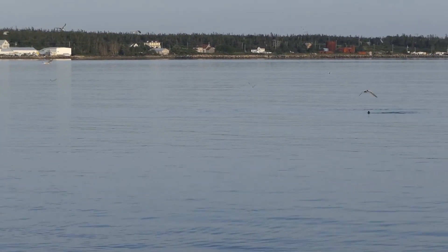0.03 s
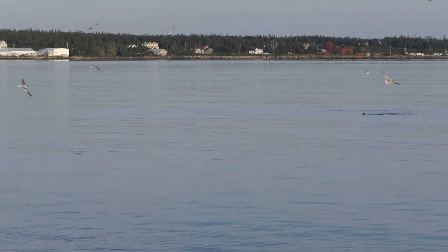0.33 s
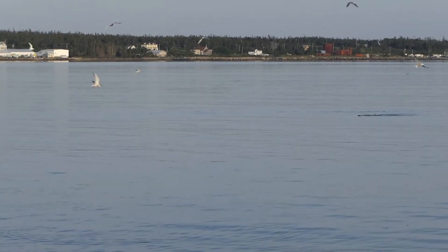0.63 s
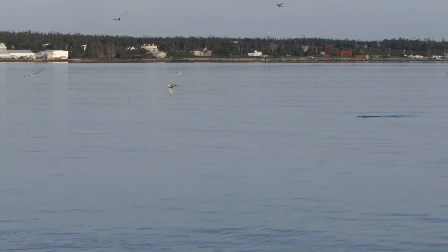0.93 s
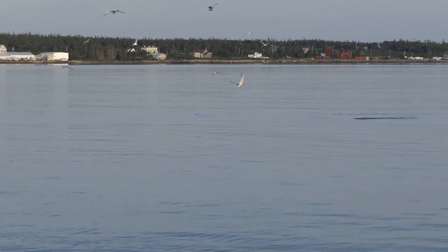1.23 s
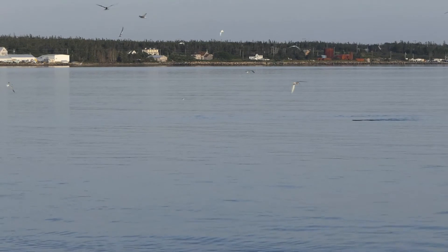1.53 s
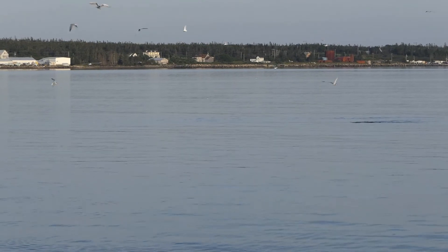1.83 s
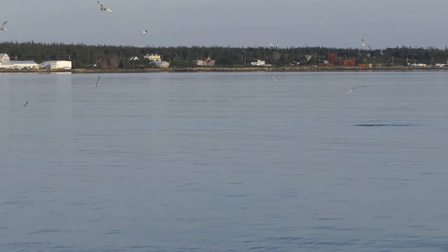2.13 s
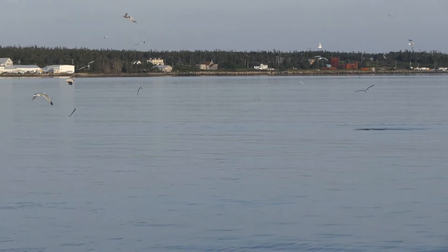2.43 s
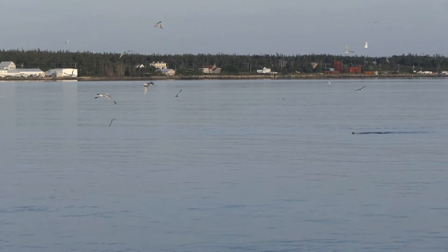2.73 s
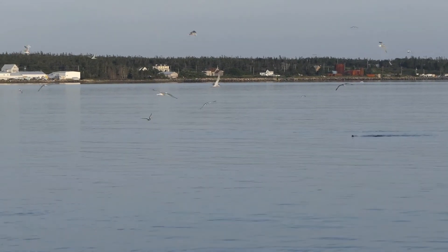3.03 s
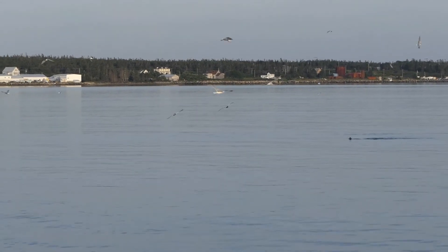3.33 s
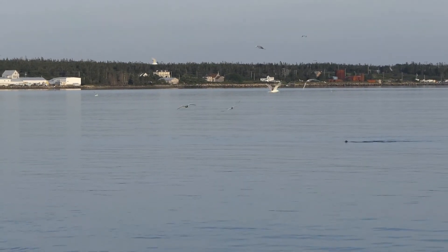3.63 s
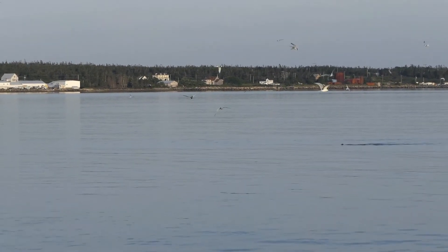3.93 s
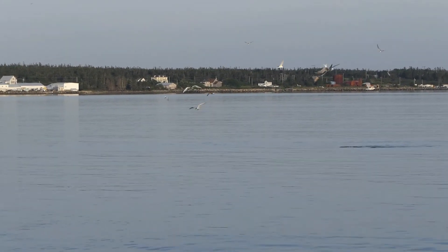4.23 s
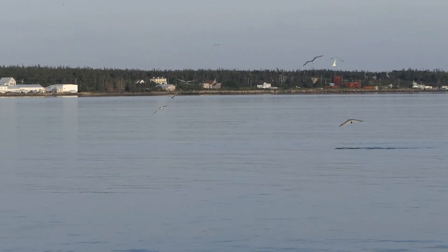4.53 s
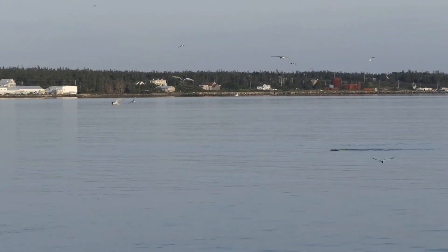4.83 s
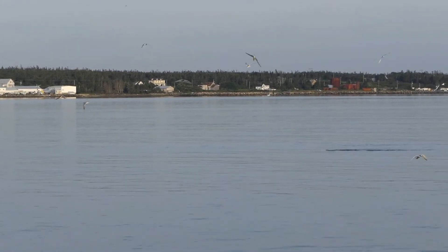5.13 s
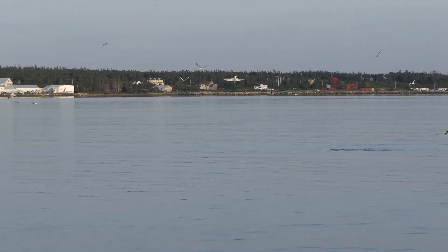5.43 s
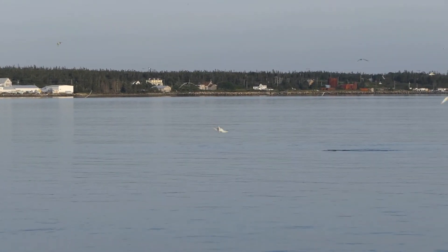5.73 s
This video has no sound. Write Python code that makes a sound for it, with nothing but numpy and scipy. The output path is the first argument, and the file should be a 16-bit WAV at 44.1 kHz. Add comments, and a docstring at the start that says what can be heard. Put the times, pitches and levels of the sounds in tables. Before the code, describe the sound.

Terns call over quiet open water, first with sparse chips, later with two short, grating rasps that stand out a little to the right. Just before the rasps, a nearby camera shutter clicks four times in rapid succession. Small plops and faint ticks dot the rest, along with more chips. Throughout, a far boat engine hums low behind soft lapping and a slight hiss.

```python
"""Terns call over a calm bay: two harsh rasps among short chips, peeps and thin, broken whistles.
The rasps are paired pulses of the syrinx through throat resonances; the other calls are harmonic notes.
A close camera shutter fires a burst of four, its strokes ringing the modes of the body.
Small plops, ticks and laps are noise bursts in a resonance. Behind it all, a far boat engine
drones as fading tones and exhaust rumble, with the wash of the water and a high hiss."""
import sys
import numpy as np
from scipy import signal
from scipy.fft import rfft, irfft
from scipy.io import wavfile
from scipy.ndimage import uniform_filter1d

SR = 44100
rng = np.random.default_rng(int(sys.argv[2]) if len(sys.argv) > 2 else 0)


def digitize_waveform(pressure):
    """Quantize a signal to 16-bit integers and store it at the path in sys.argv[1].

    Rows of a 2-D input are taken as channels; values are limited to [-1, 1].
    """
    field = np.atleast_2d(pressure).T
    bounded = np.clip(field, -1, 1)
    quanta = np.round(bounded * 32767).astype(np.int16)
    wavfile.write(sys.argv[1], SR, quanta)


N = 254456
TIME_S = np.arange(N) / SR
BINS_HZ = np.maximum(np.fft.rfftfreq(N, 1 / SR), 1)

# swell of the water: (time [s], level change [dB])
WASH_SWELL = [(0, 2), (.6, -1.5), (1.4, -5), (2.3, 0.5), (3.1, 3), (4.5, 0), (5.5, 3), (5.77, 0.5)]


def from_db(db):
    """Decibels to gain."""
    return 10 ** (np.asarray(db) / 20)


def unit_rms(x):
    """Scale to rms 1."""
    return x / np.sqrt(np.mean(x ** 2) + 1e-20)


def at_hz(points, hz):
    """Interpolate (frequency, value) points on a log-frequency axis."""
    point_hz, value = np.transpose(points)
    return np.interp(np.log(hz), np.log(point_hz), value)


def colour(x, spectrum_db):
    """Minimum-phase filter with the given spectrum."""
    cepstrum = irfft(np.log(from_db(at_hz(spectrum_db, BINS_HZ))), N)
    cepstrum[1:N // 2] *= 2
    cepstrum[N // 2 + 1:] = 0
    return irfft(rfft(x) * np.exp(rfft(cepstrum)), N)


def band_limit(x, edges_hz, kind):
    """Butterworth filter."""
    return signal.sosfilt(signal.butter(4, edges_hz, kind, fs=SR, output="sos"), x)


def resonate(x, hz, width_hz):
    """Steep resonance: two equal two-pole stages, each width_hz wide."""
    radius = np.exp(-np.pi * width_hz / SR)
    poles = [1, -2 * radius * np.cos(2 * np.pi * hz / SR), radius ** 2]
    once = signal.lfilter([1, 0, -1], poles, x)
    return signal.lfilter([1, 0, -1], poles, once)


def drift(corner_hz):
    """Low-passed random signal, rms 1."""
    return unit_rms(irfft(rfft(rng.standard_normal(N)) / (1 + (BINS_HZ / corner_hz) ** 2), N))


def stereo_noise(correlation):
    """White noise with the given left-right correlation."""
    mid, side = rfft(rng.standard_normal((2, N)))
    spectrum = np.sqrt(1 + correlation) * mid + np.sqrt(1 - correlation) * side * [[1], [-1]]
    return irfft(spectrum, N) / np.sqrt(2)


def pan(x, left_db):
    """Place by left-minus-right level."""
    return x * from_db(np.array([[1], [-1]]) * left_db / 2)


def scatter(x, wet_db, decay_s):
    """Weak reflections off shore and water, different at each ear."""
    t = TIME_S[:SR // 2]
    tail = rng.standard_normal((2, len(t))) * np.exp(-t / decay_s)
    tail /= np.sqrt(np.sum(tail ** 2, axis=1, keepdims=True))
    return from_db(wet_db) * signal.fftconvolve(x[None], tail, axes=1)[:, :N]


def background(rumble_db=-51.5, wash_db=-68, hiss_db=-75):
    """Exhaust rumble, swelling wash of the water and steady high hiss."""
    # noise spectra: (frequency [Hz], relative density [dB])
    rumble_spectrum = [(25, -27.5), (45, -25), (62, -27), (85, -10), (110, 1), (145, -6), (195, -4.5),
                       (235, -1.5), (310, -10.5), (385, -10.5), (440, -16), (510, -16), (700, -21),
                       (1000, -22.5)]
    hiss_spectrum = [(1000, 2.5), (1500, 1), (2200, -6), (3200, -8), (4500, -12), (6500, -17), (8200, -16),
                     (9300, -5.5), (11000, -6), (13000, -7.5), (15500, -11.5)]
    # stereo coherence: (frequency [Hz], left-right correlation [0-1])
    coherence = [(30, 0.97), (70, 0.61), (140, 1), (260, 0.87), (500, 0.49), (1000, 0.22), (3000, 0.081),
                 (8000, 0.57), (14000, .2)]
    correlation = at_hz(coherence, BINS_HZ)
    rumble = unit_rms(band_limit(colour(stereo_noise(correlation), rumble_spectrum), 1000, "low"))
    wash = unit_rms(band_limit(colour(stereo_noise(correlation), hiss_spectrum), [1000, 8000], "band"))
    hiss = unit_rms(band_limit(colour(stereo_noise(correlation), hiss_spectrum), 8000, "high"))
    swell_db = np.interp(TIME_S, *np.transpose(WASH_SWELL)) + 1.07 * drift(16)
    wash = pan(from_db(wash_db + swell_db) * wash, left_db=-1)
    return from_db(rumble_db) * rumble + wash + from_db(hiss_db) * hiss


def engine(gain_db=-1, hunt=0.00091, fade_hz=2, spread=0.1):
    """Engine tones share one slowly hunting speed and fade on their way over the water."""
    # engine tones: (frequency [Hz], relative level [dB], fading depth [0-1])
    tones = [(60.3, -74, .4), (69.3, -79.5, 0.3), (96.4, -66, 0.5), (115.7, -66, 0.4), (119.5, -58.5, 0.54),
             (133.5, -63, 0.17), (155.9, -50, 0.07), (168.6, -63, 1), (178, -63, 0.1), (225.2, -67, 0.25),
             (235, -63.5, 0.39), (296.7, -82, 0.47), (357.4, -71, 0.87), (372.6, -69, 0.63),
             (400, -72.5, 0.42), (583, -78.5, 0.36), (590, -76, 0.7), (711, -71.5, 0.17), (750, -82, 0.6),
             (770, -82, 0), (823, -81.5, 0.23)]
    engine_time_s = np.cumsum(1 + hunt * drift(2.5)) / SR
    out = np.zeros((2, N))
    for hz, db, fading in tones:
        phase = 2 * np.pi * (hz * engine_time_s + rng.random())
        tone = (1 + fading * drift(fade_hz)) * np.sin(phase) + fading * drift(fade_hz) * np.cos(phase)
        side = spread * np.cos(phase) * np.array([[1], [-1]])
        out += np.sqrt(2) * from_db(db) * (tone + side)
    return from_db(gain_db) * out


def lean_right(x):
    """Shift the midrange to the right."""
    # balance of the drone: (frequency [Hz], left minus right [dB])
    balance = [(110, .5), (250, 0), (400, -1), (700, -4.5), (1300, -1.5), (2400, 0.5)]
    return irfft(pan(rfft(x), at_hz(balance, BINS_HZ)), N)


def burst(start_s, level_db, hz, width_hz, decay_s):
    """Decaying noise through one steep resonance."""
    t = TIME_S[:SR // 8]
    noise = rng.standard_normal(len(t)) * np.exp(-t / decay_s)
    ring = resonate(noise, hz, 1.07 * width_hz)
    out, first = np.zeros(N), int(start_s * SR)
    out[first:first + len(t)] = from_db(level_db) * ring * np.sqrt(decay_s * SR / 2 / np.sum(ring ** 2))
    return out


def laps(count=20, level_db=-67, low_hz=895, high_hz=4000):
    """Tiny ripples break at random times and pitches, louder when the wash is."""
    out = np.zeros(N)
    for start_s, height in rng.random((count, 2)) * [TIME_S[-SR // 8 - 1], 1]:
        swell_db = np.interp(start_s, *np.transpose(WASH_SWELL))
        hz = low_hz * (high_hz / low_hz) ** height
        out += burst(start_s, level_db + swell_db, hz, width_hz=2400, decay_s=0.012)
    return out


def ticks():
    """Faint dry ticks, all of one colour."""
    # ticks: (time [s], level [dB])
    events = [(2.872, -62.5), (2.95, -64), (5.524, -62.5), (5.556, -63), (5.585, -71)]
    return sum(burst(start_s, db, hz=3800, width_hz=6900, decay_s=0.01) for start_s, db in events)


def plops(splash_ratio=2.5):
    """Each plop is a hollow ring with a higher, broader splash."""
    # plops: (time [s], level [dB], centre [Hz], width [Hz], decay [s], splash level [dB])
    events = [(2.455, -54.5, 1180, 1390, 0.016, -84), (2.709, -47, 397, 147, 0.013, -50.5),
              (5.0205, -46.5, 1000, 520, 0.0059, -57.5), (5.484, -43, 1516, 150, 0.0049, -76),
              (5.485, -46.5, 967, 70, 0.0054, -63.5), (5.557, -55.5, 1530, 900, .006, -65)]
    out = np.zeros(N)
    for start_s, ring_db, hz, width_hz, decay_s, splash_db in events:
        splash_hz = splash_ratio * hz
        out += burst(start_s, ring_db, hz, width_hz, decay_s)
        out += burst(start_s, splash_db, splash_hz, width_hz=0.82 * splash_hz, decay_s=0.021)
    return out


def shutter(start_s=1.882, cycle_s=0.0995, cycles=4, gain_db=-4, tilt_db_per_oct=5, rattle_db=2):
    """Each cycle is a dull clack, a light touch and a bright return; these and hard stops ring the body."""
    # strokes of one cycle: (delay [s], relative level [dB], rise [s], decay [s], brightness [0-1])
    strokes = [(.002, -50, 0.014, 0.019, 0.1), (0.032, -51, 0.0058, 0.023, 0.04),
               (.049, -48, .003, 0.011, .85)]
    # hard stops of the mechanism: (time [s], relative level [dB], brightness [0-1])
    stops = [(1.878, -44, 0.5), (1.928, -48, 1), (1.984, -47, 0.4), (2.011, -51, .7), (2.0285, -43, .9),
             (2.085, -44, 0.2), (2.127, -47, .95), (2.183, -46, 0), (2.226, -43.5, 0.6)]
    # camera body resonances: (frequency [Hz], width [Hz], gain [dB])
    modes = [(1040, 150, -11), (1657, 103, -10), (2200, 140, -10), (2880, 140, -20), (3860, 510, -9),
             (5050, 150, -10), (6230, 480, -11.5), (7620, 310, -15), (8900, 400, -9), (9800, 1100, -10),
             (11600, 1200, -10)]
    stop_rise_s, stop_decay_s = 0.0006, 0.004
    hits = [(start_s + cycle * cycle_s + delay_s, *shape)
            for cycle in range(cycles) for delay_s, *shape in strokes]
    hits += [(peak_s, db, stop_rise_s, stop_decay_s, brightness) for peak_s, db, brightness in stops]
    peak_s, db, rise_s, decay_s, brightness = np.array(hits).T[:, :, None]
    t = TIME_S[::10]
    falloff = np.maximum((peak_s - t) / rise_s, (t - peak_s) / decay_s)
    envelopes = from_db(db) * np.exp(-np.minimum(falloff, 20))
    rubbing = [stereo_noise(correlation=0.6) for _ in range(2)]
    out = np.zeros((2, N))
    for k, (hz, width_hz, mode_db) in enumerate(modes):
        tilt_db = tilt_db_per_oct * (brightness - 0.5) * np.log2(hz / 4000)
        force = np.linalg.norm(envelopes * from_db(tilt_db), axis=0)
        ring = unit_rms(resonate(rubbing[k % 2], hz, 2 * width_hz))
        out += from_db(mode_db) * np.interp(TIME_S, t, force) * ring
    return out * from_db(gain_db + rattle_db * drift(500))


def note(hz, level_db, harmonics_db, overtone_db, tilt_db_per_oct=0, edge_s=0.0014):
    """Eight harmonics on a pitch contour; the beak favours the first three (harmonics_db)."""
    # envelope of harmonics 4-8: (frequency [Hz], gain [dB])
    overtones = [(5000, 0), (6500, 5.5), (7500, -7), (9500, -3.5), (11300, 0.5), (13500, -18), (16000, -16)]
    t = TIME_S[:len(hz)]
    phase = 2 * np.pi * np.cumsum(hz) / SR
    gate = np.sin(np.pi / 2 * np.clip(np.minimum(t, t[::-1]) / edge_s, 0, 1))
    gains_db = list(harmonics_db) + [overtone_db + at_hz(overtones, k * hz) for k in range(4, 9)]
    tone = sum(from_db(db + tilt_db_per_oct * np.log2(k / 2)) * np.sin(k * phase)
               for k, db in enumerate(gains_db, 1))
    return np.sqrt(2) * from_db(level_db) * tone * gate


def peeps(droop=0.04, arch_db=5, wobble=0.018, flicker=0.29):
    """Each sharp peep swells, fades and droops in pitch at its end."""
    # peeps before the first rasp: (start [s], length [s], pitch [Hz], level [dB])
    calls = [(2.429, 0.0095, 1790, -59), (2.45, .015, 1867, -56.5), (2.477, .009, 1740, -59),
             (2.493, .011, 1740, -62.5), (2.512, .015, 1750, -58), (2.531, .009, 1720, -63)]
    out, shake, waver = np.zeros(N), drift(300), drift(500)
    for start_s, length_s, pitch_hz, peak_db in calls:
        span = slice(int(start_s * SR), int((start_s + length_s) * SR))
        progress = np.linspace(0, 1, span.stop - span.start)
        hz = pitch_hz * (1 - droop * progress ** 2 + wobble * waver[span])
        level_db = peak_db - arch_db * (2 * progress - 1) ** 2
        tone = note(hz, level_db, harmonics_db=(-10, -14, 0.5), overtone_db=-20)
        out[span] += tone * (1 + flicker * shake[span])
    return out


def chips(flicker=0.27, scoop=0.035, sink=0.015, wobble=0.032, sag_db=7, break_hoarse=0.38):
    """Each chip scoops up, holds, then breaks to a weaker, rougher, mostly lower note."""
    # chips: (start [s], length [s], pitch [Hz], final drop [share of pitch], level [dB],
    # tilt [dB/octave], hoarseness [factor])
    calls = [(1.161, 0.011, 1516, 0.064, -60, -6, .3), (1.502, .019, 1876, 0.15, -50, -0.5, 0.93),
             (1.752, 0.031, 1314, 0.025, -78, -6, 0.4), (2.037, 0.022, 1540, 0.019, -61.5, -5, 0.4),
             (2.3965, 0.0094, 1670, 0.06, -57.5, -8.5, .9), (3.015, 0.023, 1475, -0.018, -69, 4, 0.3),
             (3.442, 0.013, 1362, -0.15, -60, 0.5, 0.3), (3.468, 0.0094, 1715, 0.053, -51.5, 2, 0.3),
             (4.174, 0.039, 1227, 0.036, -71.5, -6, 1.7), (4.21, 0.017, 1720, 0.1, -65, -3.5, 1.5),
             (4.9231, 0.024, 1916, 0.19, -51, 0.5, .4), (5.121, 0.02, 1370, .1, -63, -3.5, .4),
             (5.2253, 0.0062, 1790, -0.0091, -56, -1, 0.5), (5.315, 0.013, 2560, 0.0079, -65.5, -5, 0.5)]
    break_at, break_width = 0.74, 0.04   # shares of the length
    out, shake, waver = np.zeros(N), drift(220), drift(240)
    for start_s, length_s, pitch_hz, drop, level_db, tilt_db_per_oct, hoarse in calls:
        span = slice(int(start_s * SR), int((start_s + length_s) * SR))
        progress = np.linspace(0, 1, span.stop - span.start)
        broken = 1 / (1 + np.exp((break_at - progress) / break_width))
        glide = 1 - scoop * np.exp(-8 * progress) - sink * progress - drop * broken
        jitter = wobble * (hoarse + break_hoarse * broken) * waver[span]
        overtone_db = -18.5 + 0.08 * (level_db + 65)   # louder notes are richer
        tone = note(pitch_hz * (glide + jitter), level_db - sag_db * broken,
                    harmonics_db=(-5.5, -1.5, -3), overtone_db=overtone_db,
                    tilt_db_per_oct=tilt_db_per_oct)
        out[span] += tone * (1 + flicker * shake[span])
    return out


def whistle(contour, harmonics_db, overtone_db, wobble, trill=0, quicken_s=1, flicker=0.28, hook=0.025):
    """A thin note with an optional quickening trill; the pitch arches and hooks down with each throb."""
    trill_start_hz, trill_end_hz, arch = 35, 62, 0.0075
    knot_s, pitch_hz, level_db = np.transpose(contour)
    out, span = np.zeros(N), slice(int(knot_s[0] * SR), int(knot_s[-1] * SR))
    t = TIME_S[span]
    trill_hz = trill_end_hz + (trill_start_hz - trill_end_hz) * np.exp((knot_s[0] - t) / quicken_s)
    trill_phase = 2 * np.pi * np.cumsum(trill_hz) / SR
    throb = -trill * np.cos(trill_phase)
    bend = 1 + arch * throb + hook * trill * np.sin(trill_phase) + wobble * drift(620)[span]
    hz = np.interp(t, knot_s, pitch_hz) * bend
    tone = note(hz, np.interp(t, knot_s, level_db), harmonics_db, overtone_db)
    out[span] = tone * (1 + throb) * (1 + flicker * drift(300)[span])
    return out


def whistles():
    """A faint trill leads into the first rasp; the second clears briefly and ends in a ragged trill."""
    # whistle contours: (time [s], pitch [Hz], level [dB])
    lead_in = [(2.546, 1630, -68), (2.575, 1563, -74), (2.592, 1620, -73), (2.616, 1540, -63)]
    clear_core = [(3.838, 1655, -53), (3.854, 1697, -43.5), (3.880, 1680, -54)]
    tail = [(4.002, 1780, -64), (4.042, 1680, -65.5), (4.075, 1520, -70.5), (4.128, 1592, -66.5),
            (4.160, 1490, -66), (4.176, 1510, -72)]
    return (whistle(lead_in, harmonics_db=(-3, -4.5, -6), overtone_db=-18, wobble=0.026,
                    trill=0.46, quicken_s=0.0073)
            + whistle(clear_core, harmonics_db=(-18, 0, -10), overtone_db=-27, wobble=0.011)
            + whistle(tail, harmonics_db=(-2.5, -2, -15), overtone_db=-28, wobble=0.036,
                      trill=0.67, quicken_s=0.02, flicker=0.39, hook=0.013))


def rasp(start_s, length_s, level_db, rate_hz, gap_s, second_gain, edge_db, jitter):
    """The syrinx slaps in quick, uneven pulse pairs, each with a puff of noise, into the throat."""
    # throat response: (frequency [Hz], gain [dB])
    throat = [(700, -21), (1200, -30), (1600, -6.5), (1950, -3.5), (2280, -30), (2600, -4.5), (3050, 4.5),
              (3550, 2.5), (3900, -12), (4500, -3), (5100, -9), (5400, -17), (6050, -15), (6500, -29)]
    # limits of the five throat registers: (frequency [Hz])
    limits_hz = (700, 2400, 3900, 5450, 6400, 11000)
    swell_db, swell_s, fade_db, fade_s = 25.5, 0.024, 35, 0.022
    arch_at, arch_db, tremble_db = 0.44, 4.3, 0.4   # arch_at: share of the length
    catch_hz, catch_db, catch_s = 42, 22, 0.1
    uneven_db, puff_gain, gap_wander = 4, 1.02, 0.012
    t = np.clip(TIME_S - start_s, 0, length_s)
    effort_db = -swell_db * np.exp(-t / swell_s) - fade_db * np.exp((t - length_s) / fade_s)
    effort_db -= 2 * arch_db * np.abs(t / length_s - arch_at)
    effort_db += tremble_db * drift(90)
    # the voice catches a few times before it runs freely
    dips_db = catch_db * np.maximum(1 - t / catch_s, 0) * np.cos(np.pi * catch_hz * t) ** 8
    cycles = np.cumsum(rate_hz * (1 + jitter * drift(200))) / SR
    pulse_index = cycles.astype(int)
    strength = from_db(uneven_db * rng.standard_normal(N))[pulse_index]
    slaps = unit_rms(np.diff(pulse_index, prepend=0))
    delayed_s = TIME_S - gap_s * (1 + gap_wander * drift(14))
    # (relative level [dB], air leak between puffs [0-1])
    registers = [(-15 + 0.53 * effort_db, 0.3),   # undertone
                 (effort_db, 0.07),   # core
                 (edge_db + 0.77 * effort_db, 0.2),   # upper edge
                 (edge_db - 14 + 0.92 * effort_db, 0.4),   # top
                 (edge_db - 19.5 + 2.2 * effort_db, 0.8)]   # fizz
    out = np.zeros(N)
    for low_hz, high_hz, (register_db, leak) in zip(limits_hz, limits_hz[1:], registers):
        puffs = unit_rms(rng.standard_normal(N) * (leak + np.cos(np.pi * cycles) ** 12))
        source = strength * (slaps + puff_gain * puffs)
        voice = band_limit(colour(source, throat), [low_hz, high_hz], "band")
        # the second pulse repeats the first: a slowly wandering comb
        voice = voice + second_gain * np.interp(delayed_s, TIME_S, voice)
        running_rms = np.sqrt(uniform_filter1d(voice ** 2, size=185) + 1e-12)
        out += from_db(register_db) * voice / running_rms
    return out * from_db(level_db - dips_db) * (t > 0) * (t < length_s)


def rasps():
    """Two harsh tern calls."""
    # rasps: (start [s], length [s], level [dB], pair rate [Hz], gap in a pair [s],
    # second pulse gain [0-1], upper edge gain [dB], rate jitter [0-1])
    calls = [(2.611, 0.21, -39.5, 240, 0.002006, 0.8, -9, .08),
             (3.751, 0.27, -40.5, 247, 0.001957, 0.57, -12, .05)]
    return sum(rasp(*call) for call in calls)


def scene():
    """Terns slightly to the right, over the shutter, small sounds and the drone of the bay."""
    bay = lean_right(engine() + background())
    harsh = rasps()
    notes = chips() + peeps() + whistles()
    small = plops() + ticks() + laps()
    terns = pan(harsh, left_db=-4) + scatter(harsh, wet_db=-19, decay_s=0.012)
    terns += pan(notes, left_db=-2) + scatter(notes, wet_db=-6, decay_s=0.0095)
    return terns + small + scatter(small, wet_db=-7, decay_s=0.027) + shutter() + bay


def record(dry):
    """Steep elliptic low-pass."""
    cutoff_hz = 15700
    return signal.sosfilt(signal.ellip(12, 0.1, 70, cutoff_hz, fs=SR, output="sos"), dry)


dry = scene()
out = record(dry)
digitize_waveform(out)
```